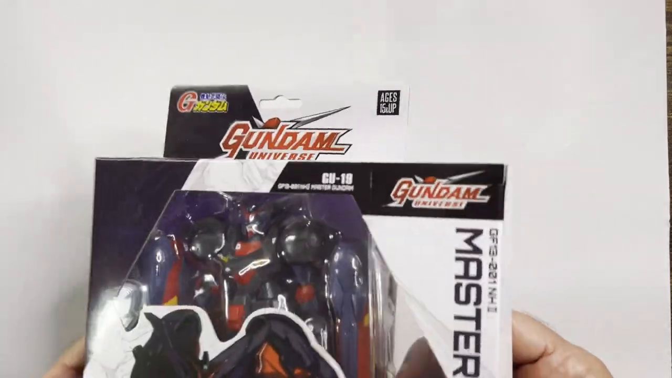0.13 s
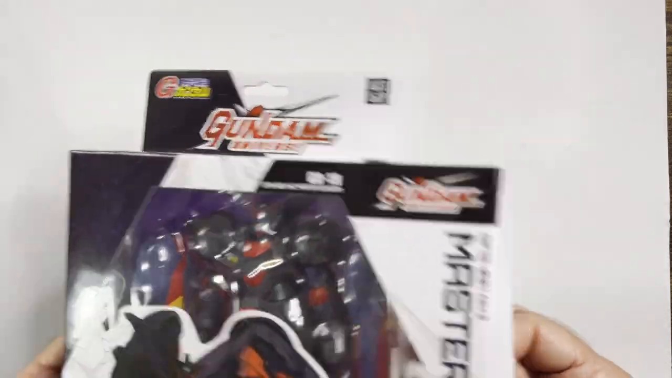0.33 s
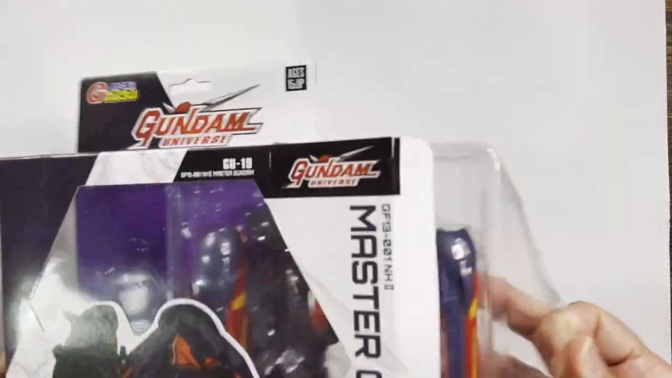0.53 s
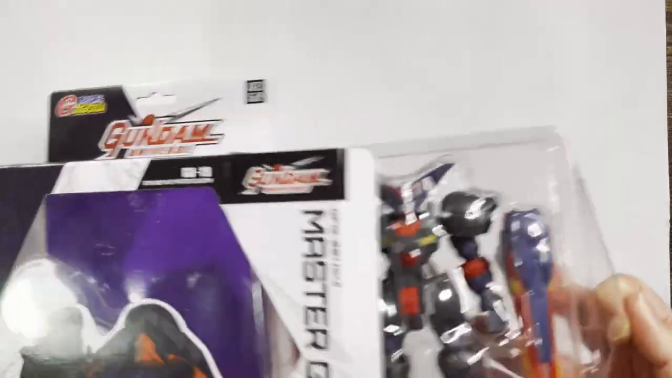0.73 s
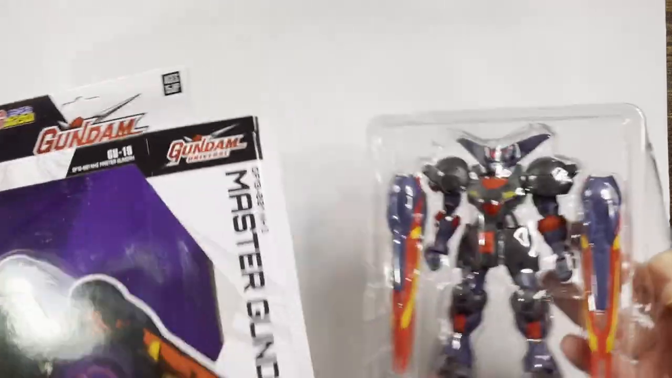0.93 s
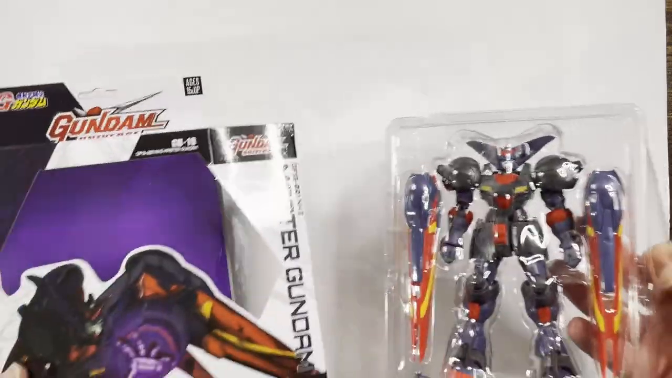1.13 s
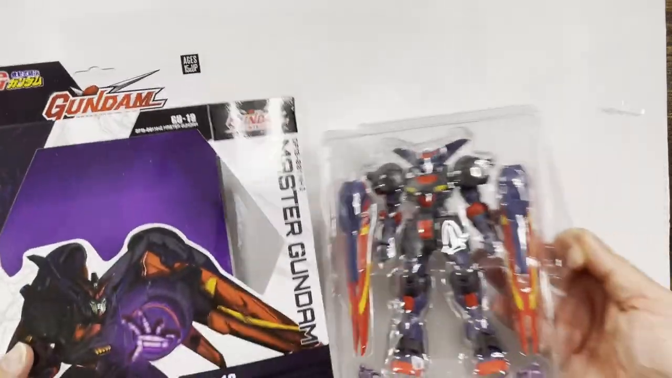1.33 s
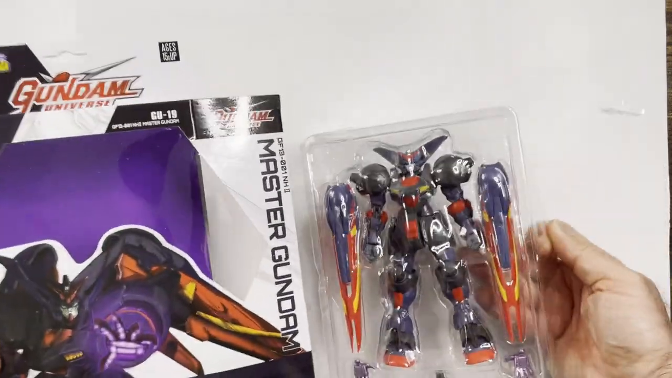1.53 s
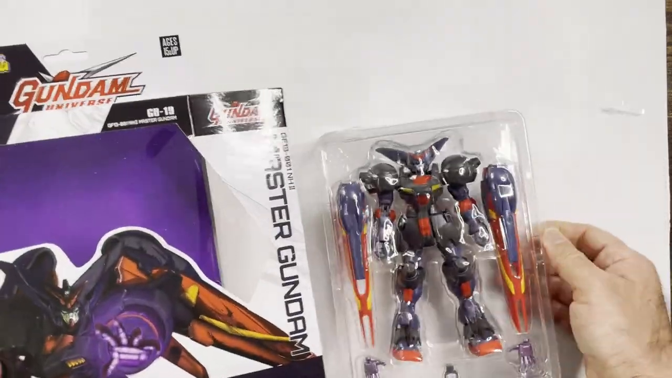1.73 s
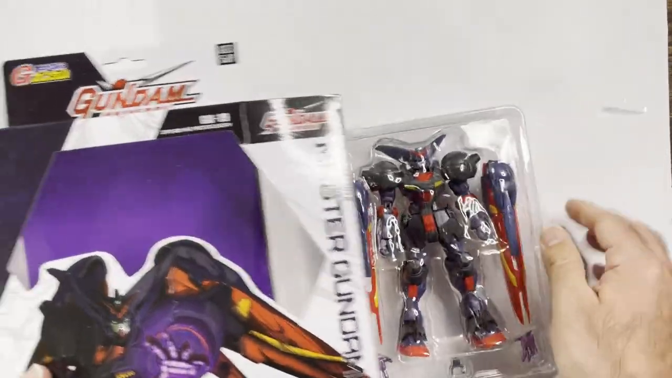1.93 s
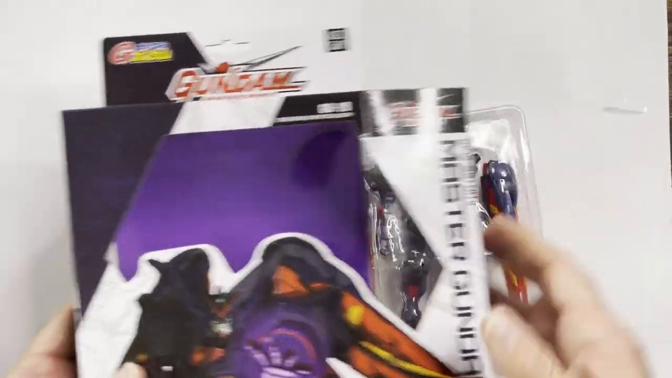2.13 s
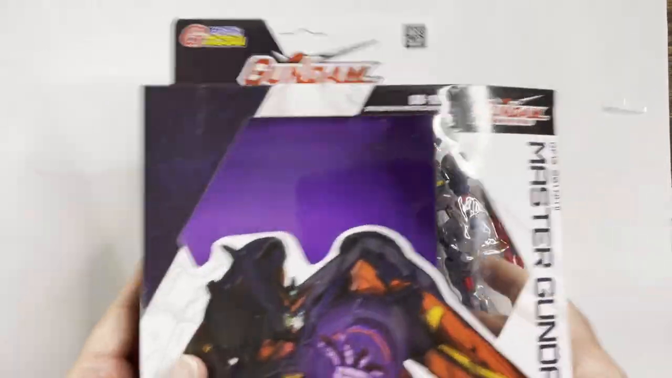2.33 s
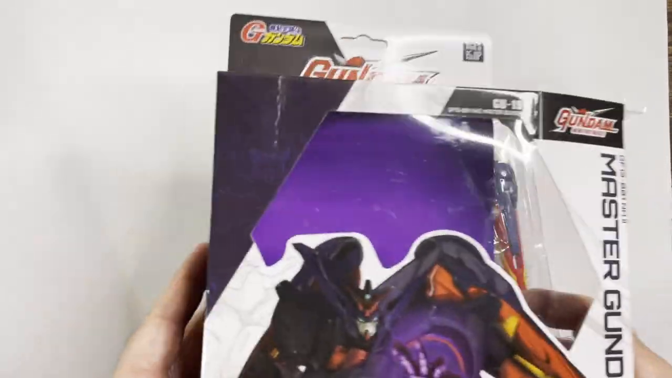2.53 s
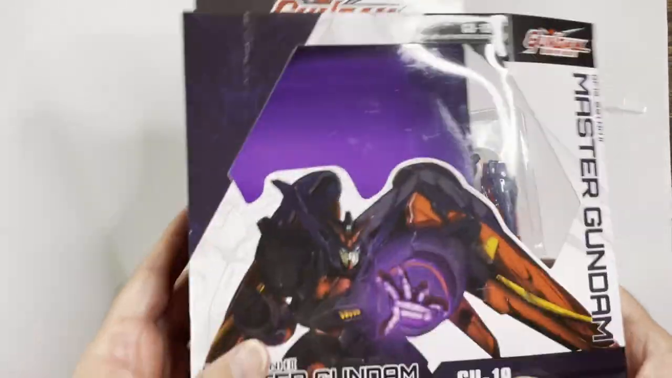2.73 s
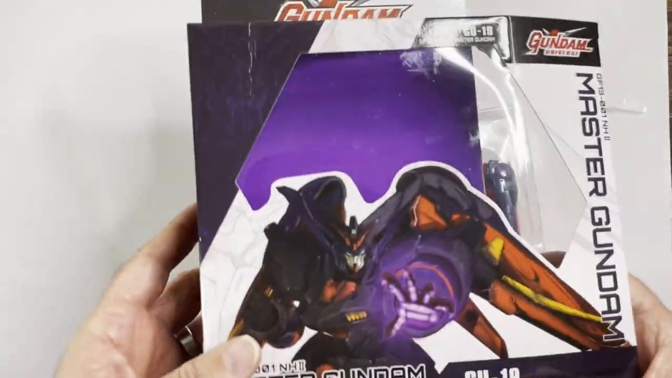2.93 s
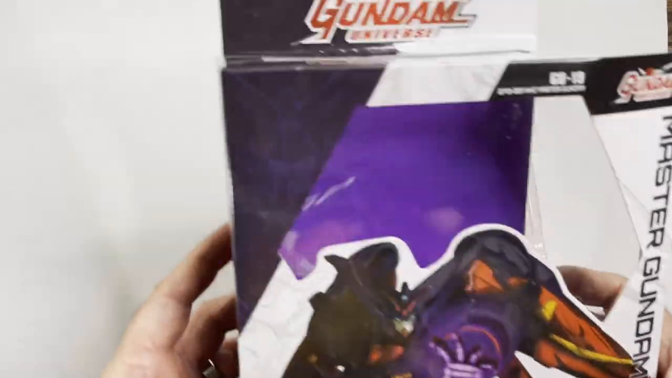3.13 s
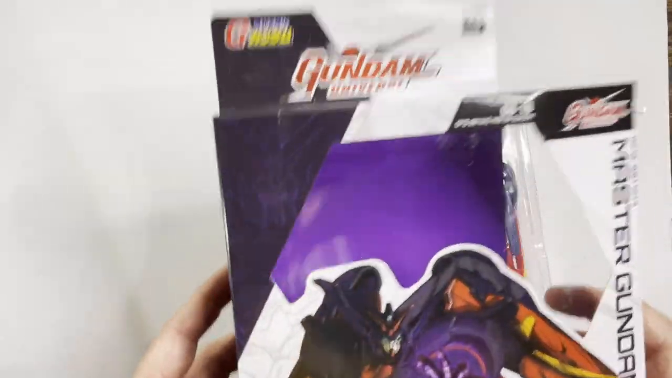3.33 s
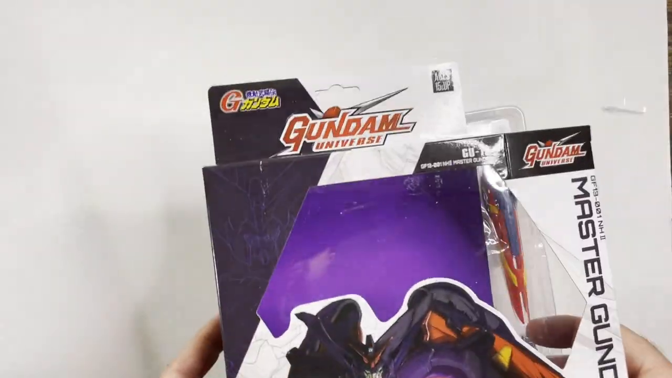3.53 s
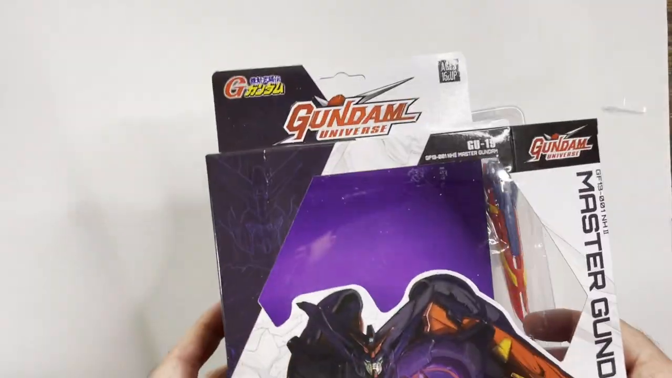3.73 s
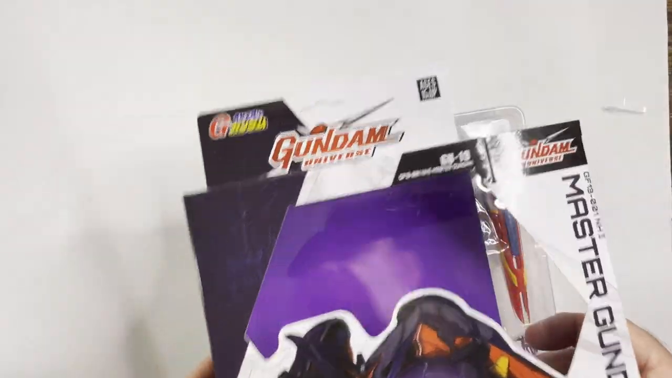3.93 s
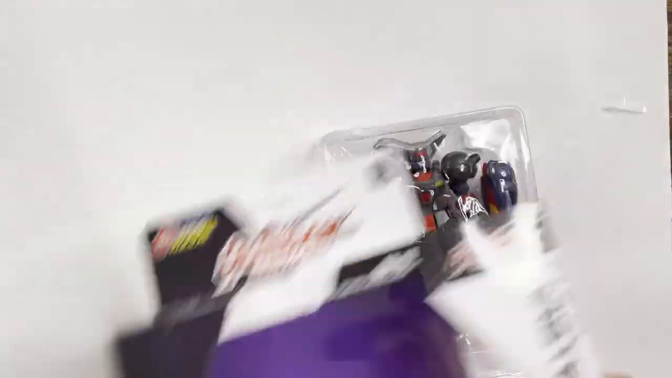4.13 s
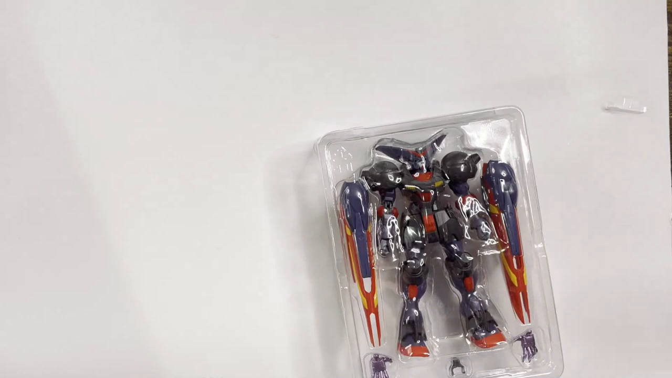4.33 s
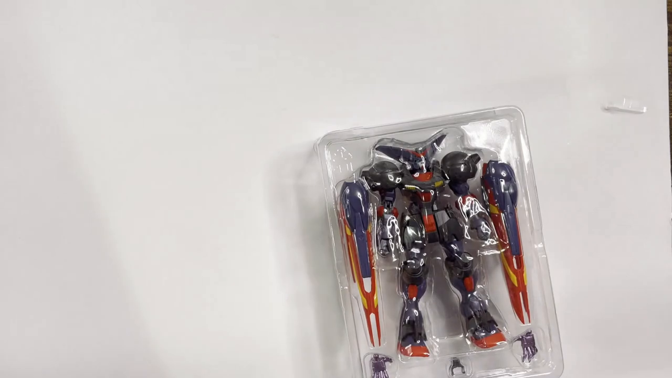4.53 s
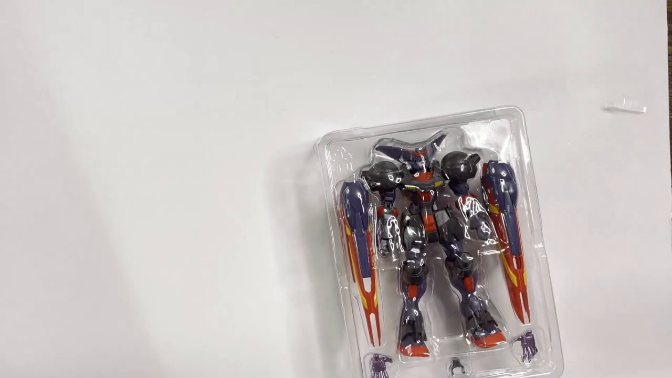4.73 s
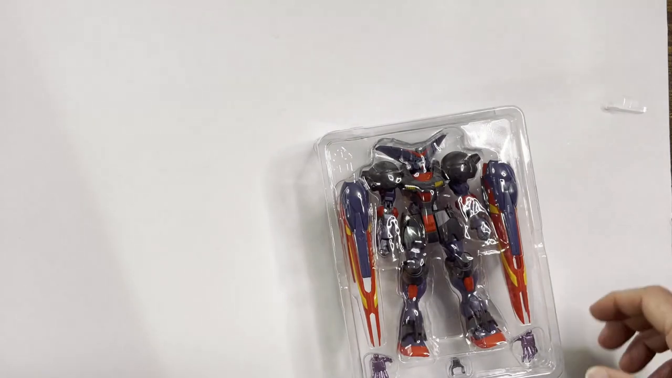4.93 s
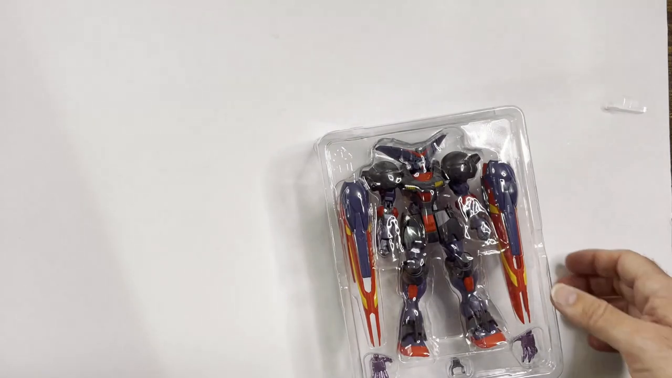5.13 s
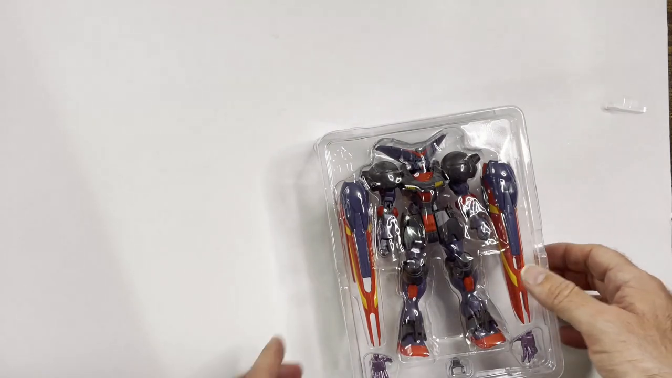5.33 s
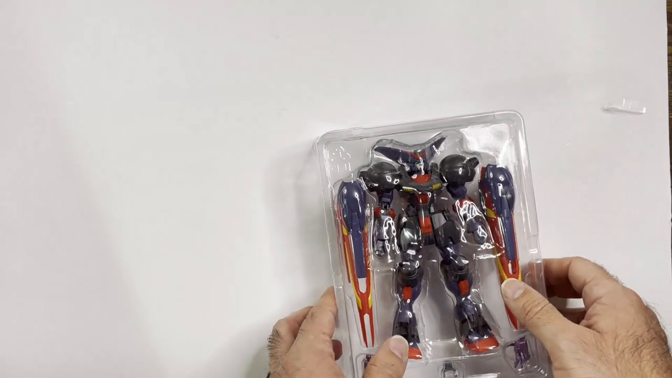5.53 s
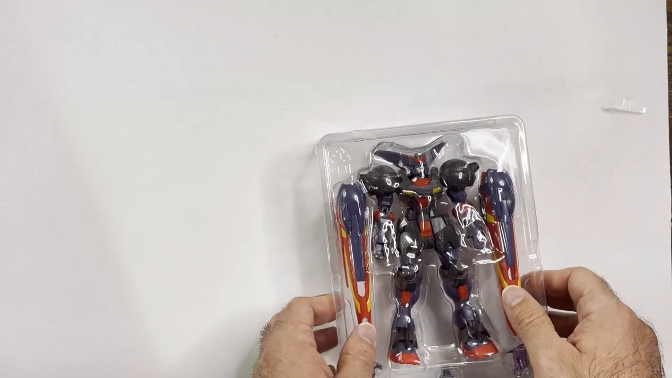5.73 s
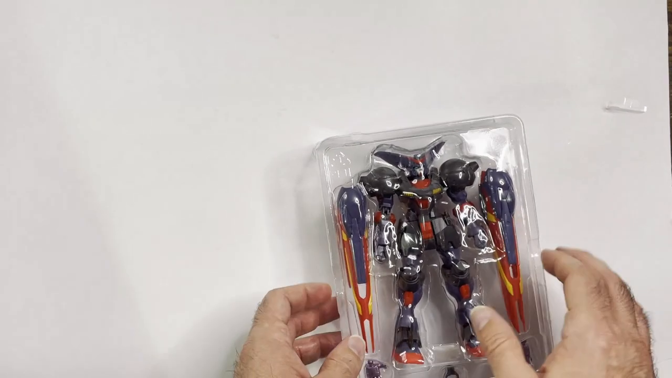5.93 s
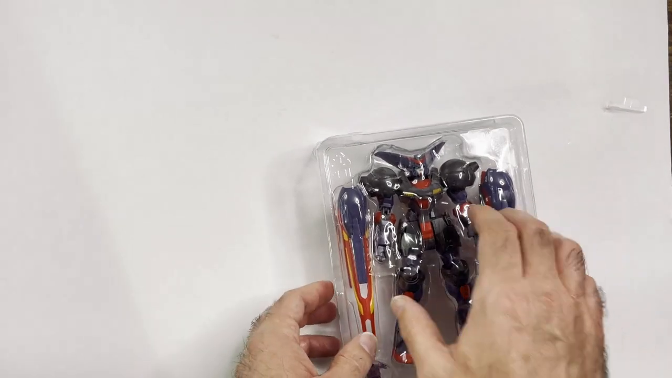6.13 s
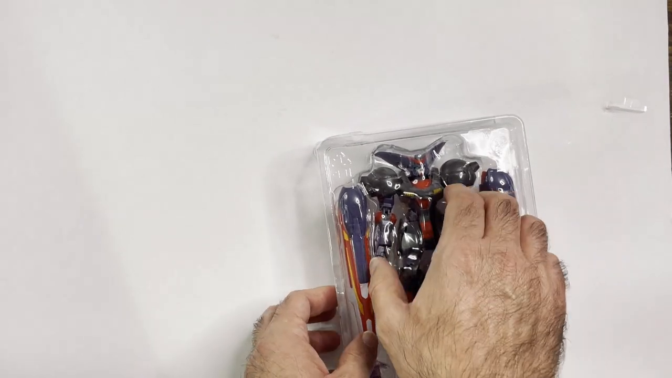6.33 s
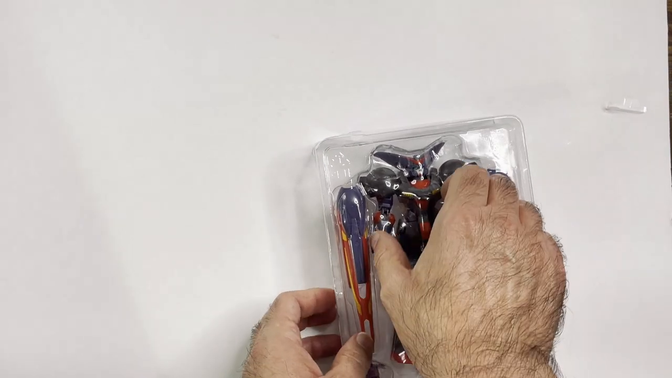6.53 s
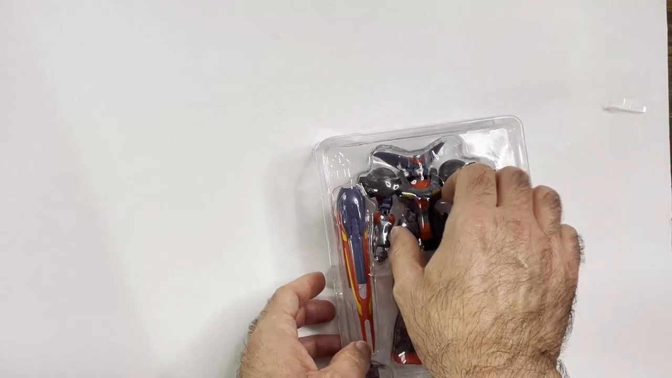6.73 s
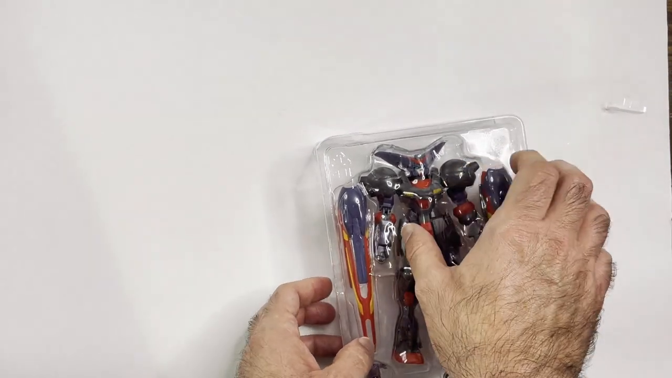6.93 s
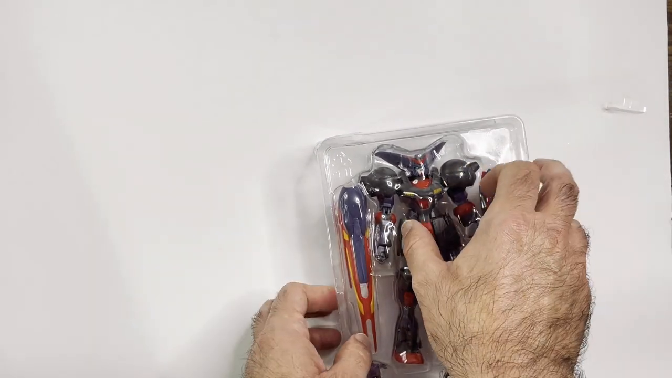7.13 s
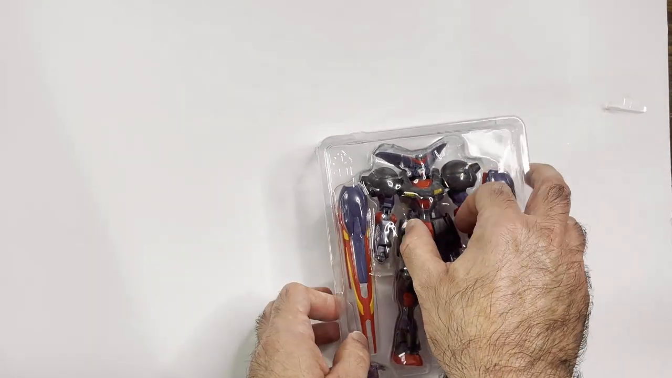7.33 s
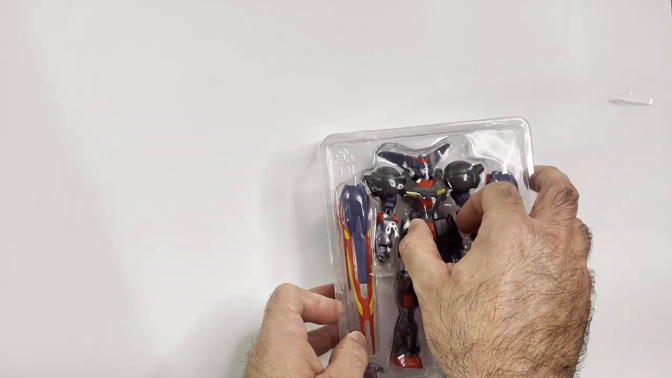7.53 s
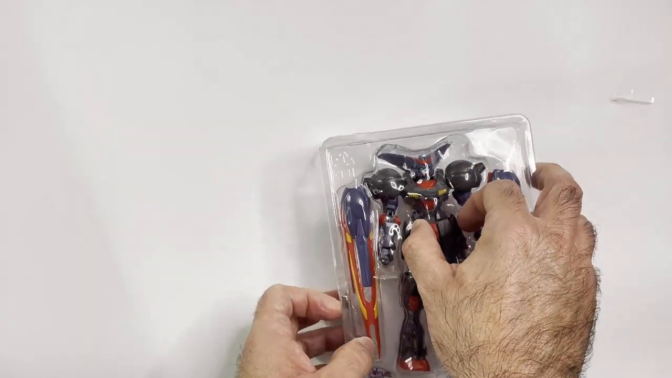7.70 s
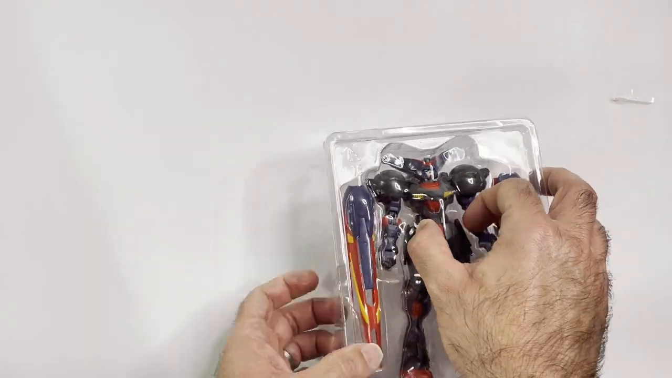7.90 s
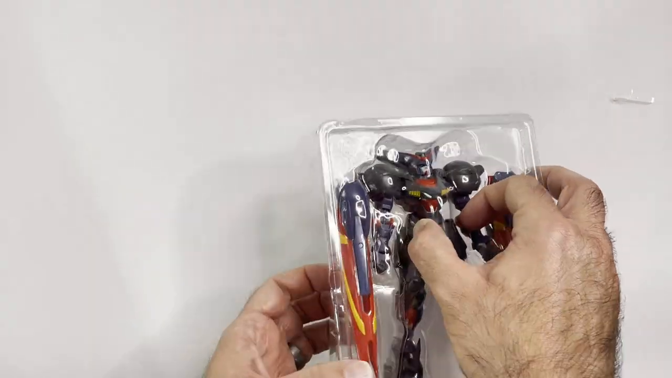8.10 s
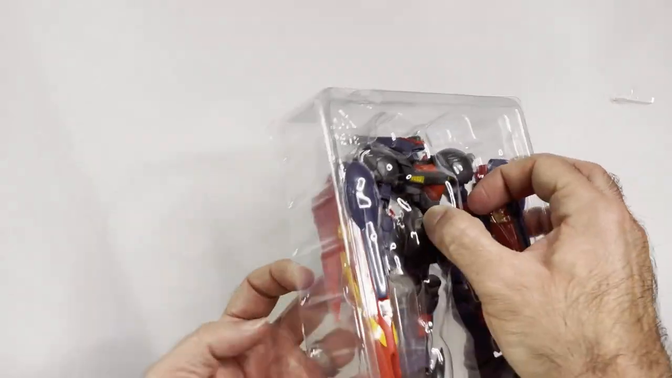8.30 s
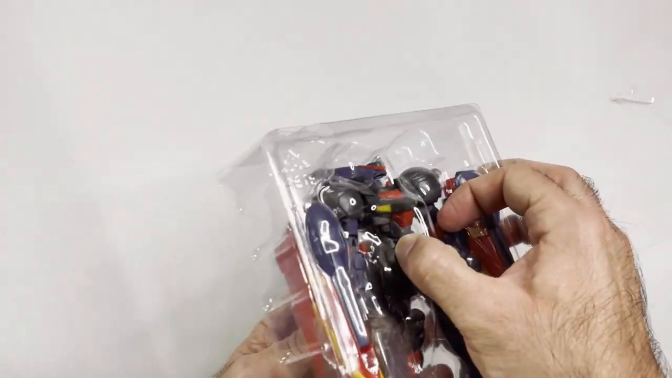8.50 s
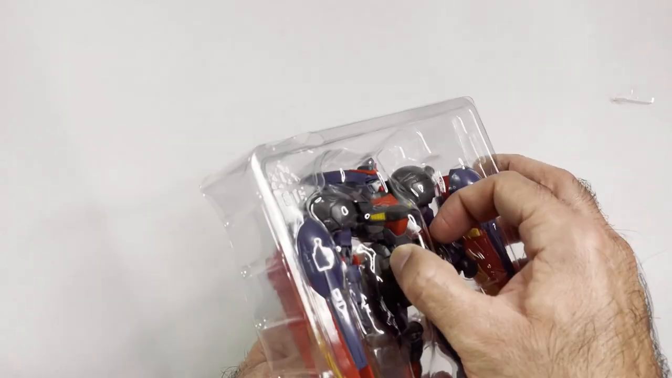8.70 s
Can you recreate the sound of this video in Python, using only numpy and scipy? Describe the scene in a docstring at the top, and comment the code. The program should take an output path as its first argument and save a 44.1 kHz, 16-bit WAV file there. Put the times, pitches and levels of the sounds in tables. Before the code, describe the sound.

Close handling of packaging: harsh plastic crunching and popping, near-quiet card taps and rubs, one sharp knock, then lighter plastic clicking and crinkling.

```python
"""In a small room, a thin plastic tray is handled, then a cardboard box, then the tray again.
Walls snap and thud as short bursts of noise that ring the object and a wavering tone for the panel.
Drags are grainy noise, skin squeaks are unsteady whistles, and moving faces push low puffs of air.
The table echoes, the room answers with a short tail, and a low rumble swells under a faint hiss.
All is heard through two microphone ports, left and right."""
import sys
import numpy as np
from scipy import signal
from scipy.fft import rfft, irfft, next_fast_len
from scipy.io import wavfile
from scipy.ndimage import uniform_filter1d

SR = 44100
rng = np.random.default_rng(int(sys.argv[2]) if len(sys.argv) > 2 else 0)


def unload_wav(signal):
    """Save mono or channel-first audio to the path in sys.argv[1] as 16-bit WAV at rate SR, clipped to [-1, 1]."""
    wavfile.write(
        sys.argv[1],
        SR,
        np.round(np.clip(np.atleast_2d(signal).T, -1, 1) * 32767).astype(np.int16),
    )


def convert_level_to_amplitude(level_db):
    """Map a level in decibels to its linear amplitude factor."""
    exponent = np.asarray(level_db, float) / 20
    return 10 ** exponent


N = 390726
M = next_fast_len(N + SR)  # padded length for filtering
HZ = np.maximum(np.fft.rfftfreq(M, 1 / SR), 1)
T = np.arange(N) / SR
SIDES = np.array([[1], [-1]])  # left, right


def along(table):
    """Reads a (frequency, value) table at every frequency, on a log pitch scale."""
    hz, value = np.transpose(table)
    return np.interp(np.log(HZ), np.log(np.maximum(hz, 1)), value)


def through(x, response):
    """Filters a sound by a frequency response."""
    return irfft(rfft(x, M) * response, M)[..., :N]


def unit(response):
    """Scales a response so that white noise keeps its power."""
    return response / np.sqrt(np.mean(abs(response) ** 2))


def band(lo_hz, hi_hz):
    """Causal band-pass, 18 dB an octave on both sides."""
    highpass = 1j * HZ / lo_hz / (1 + 1j * HZ / lo_hz)
    lowpass = 1 / (1 + 1j * HZ / hi_hz)
    return (highpass * lowpass) ** 3


def body(modes, skirt_db):
    """Resonances of alternating sign over a plain path, set relative to the strongest one."""
    peaks = 0
    for k, (hz, width, db) in enumerate(modes):
        peak = 1j * HZ * width / (hz ** 2 - HZ ** 2 + 1j * HZ * width)
        peaks = peaks + (-1) ** k * convert_level_to_amplitude(db) * peak
    return peaks + convert_level_to_amplitude(skirt_db + max(mode[2] for mode in modes))


# resonances of the tray and of the box: (frequency [Hz], width [Hz], relative level [dB])
TRAY_MODES = [(694, 1300, 1), (1180, 61, 14.5), (1480, 67, -11), (1990, 38, 13), (2420, 560, -5),
              (3360, 170, -10), (3830, 75, -22.5), (5640, 70, -17), (6200, 190, -21), (6360, 73, -15.5)]
BOX_MODES = [(700, 35, 7), (1740, 47, -25), (2240, 410, -3.5), (3120, 38, 8), (4000, 160, -8),
             (4900, 120, 1), (6170, 110, -36)]
# when the box is in the hands instead of the tray: (start [s], end [s])
BOX_TIME = (2.2, 5.03)


def ring(force, shape):
    """The object in the hands, tray or box, rings to a force within a range of pitch."""
    is_box = (T > BOX_TIME[0]) & (T < BOX_TIME[1])
    tray = through(force * ~is_box, unit(shape * body(TRAY_MODES, -11.5)))
    box = through(force * is_box, unit(shape * body(BOX_MODES, -14.0)))
    return tray + box


def held(s, hold_s, db, rise_db_s, fall_db_s):
    """Gain of strokes that rise, hold and let go at steady dB per second; their powers add."""
    s, hold_s, db = (np.asarray(v)[:, None] for v in (s, hold_s, db))
    t = T[::32]
    before = np.maximum(s - t, 0)
    after = np.maximum(t - s - abs(hold_s), 0)
    shape = db - rise_db_s * before - fall_db_s * after
    return np.interp(T, t, np.sqrt((convert_level_to_amplitude(shape) ** 2).sum(axis=0)))


def crackle(per_s, spread, smear_s):
    """Noise that comes in small slips of very unequal size, evened to rms 1 over 1/8 s."""
    size_db = spread * rng.exponential(size=N)
    slips = (rng.random(N) < per_s / SR) * convert_level_to_amplitude(size_db)
    fade = np.exp(-1 / (smear_s * SR))
    grains = signal.lfilter([1], [1, -fade], slips)
    x = rng.standard_normal(N) * (grains + 0.28)
    return x / np.sqrt(uniform_filter1d(x ** 2, size=SR // 8))


def panel(t, hz, noise):
    """One flexing panel sounds a tone whose pitch and strength waver."""
    waver = uniform_filter1d(noise, size=64) * 8
    return (1 + .5 * waver) * np.sin(2 * np.pi * hz * t + 0.83 * waver[::-1])


# walls buckle or knock (flicks() plays these too): (time [s], relative level [dB],
# panel pitch [Hz], tick level against the snap [dB], decay [dB per ms, limited to 0.2-6])
SNAPS = [(.005, 0, 1981, -30.5, 2.07), (.091, -36, 1604, -6.5, 3), (0.117, 3, 1180, -25.5, 1.7),
         (.304, -0.5, 1575, -11, 0.8), (.395, -10, 483, -18.5, 0.5), (.447, -15.5, 514, -15.5, 1.55),
         (.494, -11.5, 363, -20.5, 0), (.525, -5, 678, -28.5, 3.1), (.556, -8, 688.4, -13.5, 1.24),
         (.579, -14, 363, -15, 4.5), (.622, -17.5, 1029, -18.5, 0.75), (.658, -13, 1400, -22.5, 1.5),
         (.679, -20, 354, -24.5, 1.75), (.706, -13.5, 1523, -23.5, 1.5), (.764, -2.5, 1410, -24.5, 1.5),
         (.813, -9, 423.4, -20, 1), (.909, -2, 508.8, -23, 0.84), (.925, -22.5, 400, -8.5, 3),
         (.938, -21, 360, -8, 3), (1.058, -30, 3736, -4, 1.2), (1.089, -45, 3810, 0, 3),
         (1.123, -36.5, 4108, 2.5, 4), (1.146, -36.5, 3770, 0.5, 1.7), (1.336, -26, 2015, -21, 2),
         (1.356, -12, 721, -15.5, 1.7), (1.409, -28, 633.4, -15.5, 1), (1.497, -20.5, 1820, -13.5, 1.3),
         (1.582, -14, 1930, -20, 1.36), (1.617, -19, 1712, -15.5, 1), (1.671, -11.5, 773, -23, 1.25),
         (1.733, -19.5, 1265, -13, 0.94), (1.855, -14.5, 1037, -16, 1.07), (1.924, -10.5, 701, -21, 1.8),
         (1.955, -6, 513, -20, 1.5), (2.24, -26, 2026, -24, 2.5), (2.265, -27.5, 778, -70, 2.8),
         (2.359, -32, 700, -20.5, 0.8), (2.389, -41.5, 697, -16.5, 1.7), (2.595, -44.5, 992, -18, 1),
         (2.713, -35.5, 705, -13.5, 1), (2.757, -37, 694, -29.5, 3.1), (2.836, -43, 700, -12.5, 2),
         (2.917, -40, 670, -18.5, .5), (3.116, -42, 744, -28, 5), (3.219, -31, 718, -61, 4.5),
         (3.399, -43, 2240, -26, 1), (3.499, -62, 4000, -8, 1.5), (3.563, -53, 592, -24, 2),
         (3.942, -42.5, 760, -16.5, 3), (4.04, -35.5, 435, -19.5, 1), (4.138, -42, 543, -40, 0.5),
         (4.218, -40.5, 2110, -11.5, 1.3), (4.726, -58.5, 690, -11.5, 0.5), (4.945, -38.5, 1100, -16.5, 1),
         (4.966, -12, 663, -28.5, 1.7), (4.981, -19, 685, -17.5, .95), (5, -24.5, 680, -28.5, 0.8),
         (5.214, -44, 643, -36, 1.3), (5.375, -32.5, 746, -16.5, 2.5), (5.458, -31.5, 1092, -8.5, 1),
         (5.479, -27.5, 537.5, -22, .5), (5.499, -30, 526, -29.5, 0.2), (5.6, -34, 724, -8, 0.5),
         (5.622, -27.5, 1890, -30, 4), (5.66, -41, 770, -3, 1.15), (5.708, -31, 539, -8, 1.5),
         (5.834, -28, 789, -13, 0.4), (5.889, -8.5, 761, -35, 0.9), (5.919, -26, 715.6, -23, 1.5),
         (6.136, -29.5, 826, -15.5, 0.8), (6.152, -21.5, 792, -18.5, 1.4), (6.24, -34.5, 567, -10, 6.5),
         (6.292, -25.5, 617, -13, 1.35), (6.34, -35, 765, -18, 0.5), (6.476, -38, 800, -14, 0.5),
         (6.531, -38.5, 435, -13, 1.5), (6.573, -36, 762, -11, 3.5), (6.612, -37.5, 1400, -13.5, 2),
         (6.627, -30, 1294, -26, 2.2), (6.832, -26.5, 1180, -18, 4), (6.861, -33, 806, -11, 0.5),
         (6.934, -28.5, 768, -15, 0.37), (7.075, -28.5, 848, -17, 1.9), (7.137, -21, 700, -22.5, 3.5),
         (7.188, -31.5, 762, -8, 2.5), (7.212, -30, 1034, -8, 1.1), (7.24, -34.5, 749.4, -7.5, 1),
         (7.303, -25.5, 558.5, -19.5, 0.9), (7.362, -29, 762, -27, 1), (7.389, -33, 425, -20.5, 2),
         (7.431, -28.5, 738, -60, 1.3), (7.469, -31.5, 810, -35, 1.1), (7.521, -34.5, 856.5, -23, 0.4),
         (7.575, -37, 686, -27.5, 0.5), (7.596, -31, 640, -24, 2), (7.664, -18, 948, -35, 2),
         (7.806, -45.5, 772, -39, -0.5), (7.86, -33, 1275, -24, 1), (7.901, -38.5, 727, -37, 0.4),
         (7.952, -28, 1190, -46, 1), (7.971, -27, 559, -17, 2.2), (8.009, -29, 573, -19.5, 2),
         (8.057, -19, 1187, -13.5, 1.1), (8.076, -11, 1738, -26, 3), (8.149, -46, 366, -5, 1.1),
         (8.222, -23, 555, -28.5, 1.2), (8.267, -26, 1180, -22, 1.35), (8.289, -24.5, 438, -26.5, 2.65),
         (8.335, -29, 711, -26, 3), (8.43, -21, 717, -19, .8), (8.449, -27.5, 703, -19.5, 1.36),
         (8.479, -20.5, 1004, -26.5, 1.4), (8.509, -22, 1233, -13.5, 2.1), (8.526, -24.5, 667, -24.5, 1),
         (8.561, -14, 1513, -37, 1.86), (8.605, -28.5, 945, -21.5, 3.4), (8.676, -27, 797, -34.5, 1.5),
         (8.701, -14.5, 1023, -24, 3.6), (8.736, -31.5, 734, -23, 1.8), (8.766, -32, 1058, -40, 0.47)]


def snaps():
    """Each buckle is a short burst of force that rings the body, with a tone for the panel that gave way."""
    t = np.arange(6000) / SR
    force = np.zeros((4, N + len(t)))
    chance = rng.standard_normal((len(SNAPS), 4, len(t)))
    for (s, db, hz, tick_db, decay), (snap, thud, tick, flex) in zip(SNAPS, chance):
        i = int(s * SR)
        thud_db = -28 - 0.35 * tick_db  # the blunter the contact, the more thud
        fall_db_s = 1000 * np.clip(decay, .2, 6)
        # a slow give also starts softly; treble dies first, bass last
        rise = 1 - np.exp(-t * fall_db_s)
        slowness = np.array([[1], [1.6], [.7], [1.1]])  # snap, thud, tick, panel
        fades = convert_level_to_amplitude(-fall_db_s * t / slowness)
        # a large low panel gives a dull snap
        dull = signal.butter(3, min(2.77 * hz, 9000), fs=SR)
        snap = signal.lfilter(*dull, snap) * np.sqrt(3500 / hz)
        blow = np.array([snap, thud, tick, panel(t, hz, flex)])
        levels = convert_level_to_amplitude(db + np.array([[0], [thud_db], [tick_db], [0]]))
        force[:, i:i + len(t)] += blow * rise * fades * levels
    force = force[:, :N]
    snap = convert_level_to_amplitude(-8.5) * ring(force[0], band(300, 9000))
    thud = ring(force[1], band(110, 930))
    tick = convert_level_to_amplitude(6.5) * ring(force[2], band(3000, 7400))
    return snap + thud + tick + convert_level_to_amplitude(-2.5) * force[3]


def flicks():
    """The edge of every snap is a very short bright burst that does not ring the body."""
    blows = np.zeros(N)
    s, db, _, tick_db, _ = np.transpose(SNAPS)
    blows[(s * SR).astype(int)] = convert_level_to_amplitude(db + tick_db - 12)
    t = np.arange(2000) / SR
    pulse = np.exp(-t / .004) * (1 - np.exp(-t / 0.00092))
    env = np.convolve(blows, pulse)[:N]
    return through(env * rng.standard_normal(N), unit(band(6700, 18000) ** 2))


# a hollow face is bumped: (time [s], level [dB], decay [dB per ms, sign ignored], centre [Hz])
BUMPS = [(.447, -20, .9, 400), (.494, -25, 0, 400), (.525, -5, 1.1, 504), (0.68, -23.5, -0.5, 180),
         (2.265, -17.5, 0.72, 350), (2.757, -35.5, 0.9, 450), (3.219, -28, 0.5, 400), (4.139, -30, 1, 474),
         (4.966, -16.5, .5, 301), (4.998, -18.5, 0.9, 240), (5.22, -34, 0.4, 247), (6.153, -29, 3.5, 300),
         (7.362, -32, 0.8, 395), (8.482, -24, 1.9, 400)]


def bumps():
    """A soft push on a large face: only a broad low band answers."""
    t = np.arange(8000) / SR
    out = np.zeros(N + len(t))
    noises = rng.standard_normal((len(BUMPS), len(t)))
    for (s, db, decay, hz), noise in zip(BUMPS, noises):
        i = int(s * SR)
        low_band = signal.butter(2, [hz / 1.7, hz * 1.59], "band", fs=SR)
        low = signal.lfilter(*low_band, noise) * np.sqrt(SR / 2 / hz)
        rise = 1 - np.exp(-t / .001)
        out[i:i + len(t)] += low * rise * convert_level_to_amplitude(db - 1000 * abs(decay) * t)
    return out[:N]


# a hand grips, squeezes or drags (hands() and draught() use these too): (time [s], hold [s],
# creak of the walls [dB], boom of the hollow [dB], rasp of the edges [dB])
GRIPS = [(0, 0.0088, -18.5, -31, -31.5), (0.149, 0.022, -30.5, -40, -46), (0.291, .05, -31, -39, -37),
         (.42, 0.088, -22, -28.5, -33), (0.577, .04, -28, -32, -39.5), (0.669, 0.025, -24.5, -30.5, -33.5),
         (0.763, 0.051, -18, -28.5, -28), (.9, 0.059, -35, -47, -49.5), (1.065, 0.084, -63.5, -56, -51),
         (1.355, .1, -36, -47, -50.5), (1.498, 0.043, -58, -45.5, -53.5), (1.579, 0.097, -30.5, -39.5, -44),
         (1.722, 0.26, -42, -44.5, -50.5), (1.856, 0.11, -29, -37, -45), (1.941, 0.043, -24.5, -34, -38),
         (2.011, 0.023, -51.5, -36.5, -52), (2.254, 0.008, -62, -37, -78), (2.349, .05, -57, -51, -57.5),
         (2.526, 0.21, -66, -71, -67.5), (2.707, 0.076, -61, -49, -56.5), (2.839, 0.055, -66, -60, -66.5),
         (2.935, 0.029, -61, -61, -66.5), (3.083, 0.067, -48.5, -56, -64),
         (3.197, 0.051, -61.5, -53, -68.5), (3.396, 0.021, -63, -52, -65.5),
         (3.883, 0.041, -69, -63.5, -68), (3.942, 0.073, -53, -53, -60), (4.093, 0.1, -59.5, -60.5, -59),
         (4.723, 0.02, -69.5, -62, -68.5), (4.968, 0.043, -26.5, -25, -43.5),
         (5.08, 0.1, -56, -48.5, -59.5), (5.208, 0.082, -70, -47, -66.5),
         (5.456, 0.11, -36.5, -40.5, -49.5), (5.706, 0.024, -56, -44.5, -48),
         (5.803, 0.033, -45.5, -52, -55), (5.891, 0.08, -33, -38, -43.5), (6.141, .04, -45, -40, -56),
         (6.274, .08, -51.5, -46.5, -56.5), (6.466, 0.19, -52.5, -46, -63), (6.708, .05, -62, -59.5, -74),
         (6.834, 0.073, -43, -43.5, -52.5), (6.959, 0.021, -60, -43.5, -47.5),
         (6.196, 0.034, -50, -58, -63), (7.068, 0.22, -42, -45.5, -56), (7.367, 0.051, -51, -43, -57),
         (7.522, 0.145, -46.5, -48, -63.5), (7.713, .04, -49.5, -47.5, -63.5), (7.906, 0.14, -54, -50, -70),
         (8.054, .03, -33, -48, -51), (8.184, .05, -49, -51, -68), (8.261, 0.029, -41.5, -41.5, -72),
         (8.429, .1, -39, -40, -53), (8.555, 0.076, -42.5, -50, -58), (8.69, 0.046, -38.5, -43, -64.5),
         (8.773, .1, -49.5, -44, -57)]
GRIP_RISE_DB_S, BOOM_FALL_DB_S = 901, 168.5  # dB per second


def grip(db, fall_db_s):
    """Gain of one layer over all grips; the released walls go on settling faintly."""
    s, hold = np.transpose(GRIPS)[:2]
    main = held(s, hold, db, GRIP_RISE_DB_S, fall_db_s)
    settling = held(s, hold, db - 24.5, GRIP_RISE_DB_S, fall_db_s=70)
    return main + settling


# skin wipes over a smooth face, treble only: (time [s], hold [s], hiss level [dB])
WIPES = [(.28, .02, -45), (0.562, 0.11, -49.5), (.64, .03, -45), (0.757, .08, -43.5), (1.685, .01, -38.5),
         (1.733, .005, -33), (1.949, .03, -48), (4.117, 0.092, -59), (5.74, .03, -55.5), (5.92, 0.059, -44),
         (6.471, .008, -37), (6.871, 0.01992, -40.5), (6.965, .02, -48), (7.271, .03, -48),
         (8.488, .03, -52.5)]


def hands():
    """Dragging and squeezing: walls creak in grains, the hollow booms, edges rasp, skin hisses."""
    creak_db, boom_db, rasp_db = np.transpose(GRIPS)[2:]
    creak = grip(creak_db, fall_db_s=230)
    boom = grip(boom_db, BOOM_FALL_DB_S)
    rasp = grip(rasp_db, fall_db_s=262)
    wipes = held(*np.transpose(WIPES), rise_db_s=1499.5, fall_db_s=500)
    hiss = rasp * convert_level_to_amplitude(-11.5) + wipes
    # panels of three sizes slip at their own moments, so every grain has its own colour
    panels = [(430, 790, -7.0), (800, 1800, -7.5), (1400, 2500, -10)]  # (from Hz, to Hz, dB)
    walls = 0
    for lo, hi, db in panels:
        grains = crackle(120, spread=3.7, smear_s=0.009)
        walls = walls + convert_level_to_amplitude(db) * ring(creak * grains, band(lo, hi))
    hollow = ring(boom * crackle(66, spread=2.5, smear_s=0.024), band(120, 720))
    edges = ring(rasp * crackle(300, spread=3.2, smear_s=.005), band(3000, 7000))
    skin = through(hiss * crackle(250, spread=4.0, smear_s=.002), unit(band(6000, 17000)))
    return walls + hollow + edges + skin


SLIP_RISE_DB_S = 1104  # how fast squeaks and rubs start, dB per second
# skin slips on smooth plastic: (time [s], hold [s], pitch at that time before waver [Hz], level [dB])
SQUEAKS = [(5.469, 0.066, 5460, -42), (5.597, .015, 5550, -49), (5.663, .005, 5670, -46),
           (5.725, 0.035, 5540, -36.5), (7.218, 0.0065, 5540, -46), (7.33, 0.0073, 5500, -52),
           (7.364, 0.0071, 5700, -47.5)]


def squeaks():
    """Fast stick and slip: an unsteady, upward gliding whistle with its octave."""
    out = np.zeros(N)
    pitch_waver, level_waver = through(rng.standard_normal((2, N)), unit(band(25, 400)))
    for s, hold, hz, db in SQUEAKS:
        glide = 1480 * np.clip(T - s, -.05, .15)  # 1480 Hz per second
        pitch = (hz + glide) * (1 + 0.018 * pitch_waver)
        phase = 2 * np.pi * np.cumsum(pitch) / SR
        gain = held([s], [hold], [db], SLIP_RISE_DB_S, fall_db_s=999) * convert_level_to_amplitude(4.6 * level_waver)
        out += gain * (np.sin(phase) + convert_level_to_amplitude(-13.0) * np.sin(2 * phase))
    return out


def rub(strokes, width_hz, fall_db_s):
    """A sliding contact sings in one loose resonance: friction noise gathered around a centre."""
    out = np.zeros(N)
    for s, hold, hz, db in strokes:
        a, b = through(rng.standard_normal((2, N)), unit(band(0.99, width_hz)))
        phase = 2 * np.pi * hz * T
        gain = held([s], [hold], [db], SLIP_RISE_DB_S, fall_db_s)
        out += gain * (a * np.sin(phase) + b * np.cos(phase))
    return out


# rubs on the card: (time [s], hold [s], centre [Hz], level [dB])
CARD_RUBS = [(3.115, .015, 2180, -51.5), (3.23, .005, 2220, -50), (3.31, .07, 2240, -64.5),
             (3.404, 0.006, 2240, -48), (3.48, 0.027, 2270, -74)]


def card_rub():
    """Sliding on card makes a wide band of friction noise."""
    return rub(CARD_RUBS, width_hz=390, fall_db_s=598)


# groans of the tray: (time [s], hold [s], centre [Hz], level [dB])
TRAY_GROANS = [(5.476, .04, 535, -30.5), (5.716, 0.0064, 556, -37.5)]


def tray_groan():
    """Sliding on the tray makes a low, narrow band of friction noise."""
    return rub(TRAY_GROANS, width_hz=58.5, fall_db_s=300)


# air moved by broad faces being swung: (time [s], level [dB])
SWINGS = [(0, -10), (.06, -61), (.37, -52), (.43, -40), (.7, -39), (.95, -44), (1.05, -61), (1.5, -54),
          (1.96, -44.5), (2.2, -50.5), (2.3, -40.5), (2.58, -54.5), (2.75, -55), (2.95, -41), (3.03, -59),
          (3.25, -50.5), (3.43, -49), (3.53, -65), (4.03, -50), (4.32, -66), (5.3, -51.5), (5.7, -57),
          (8.86, -65)]


def draught():
    """Broad faces push air when swung or gripped: low noise, a little different at each port."""
    mid, side = through(rng.standard_normal((2, N)), unit(band(45, 130) ** 2))
    s, hold, _, boom_db, _ = np.transpose(GRIPS)
    swung = convert_level_to_amplitude(np.interp(T, *np.transpose(SWINGS)))
    gripped = held(s, hold, boom_db - 8.5, GRIP_RISE_DB_S, BOOM_FALL_DB_S)
    return (swung + gripped) * (mid + .25 * side * SIDES)


# echo off the table, left row then right row: (delay [s], level [dB])
TABLE_ECHOES = [(.0030, -14.5), (.0034, -23)]


def with_table(near):
    """The table returns one delayed, duller copy of the sound to each port."""
    dull = 1 / (1 + 1j * HZ / 3000)
    echo = np.array([convert_level_to_amplitude(db) * np.exp(-2j * np.pi * HZ * s) * dull for s, db in TABLE_ECHOES])
    return through(near, 1 + echo)


# time the room takes to fade by 60 dB: (frequency [Hz], time [s])
ROOM_FADE = [(150, 0.14), (600, .32), (2500, 0.084), (8000, 0.38), (15000, 0.14)]


def room(x):
    """Diffuse tail of fading noise, different at each port, with its own fade in each octave."""
    t = np.arange(SR // 2) / SR
    table_hz, table_s = np.transpose(ROOM_FADE)
    tail = 0
    for hz in 90 * 2. ** np.arange(8):
        t60 = np.interp(np.log(hz), np.log(table_hz), table_s)
        env = convert_level_to_amplitude(-60 * t / t60) * np.minimum(t / 0.018, 1)  # builds up over 18 ms
        mid, side = rng.standard_normal((2, len(t))) * env
        width = np.clip(hz / 530.0, .6, 1.) * 1.3  # low octaves are less wide
        tail = tail + rfft(mid + width * side * SIDES, M) * band(hz / 2, hz * 2)
    return through(x, unit(tail))


# colour of the background: (frequency [Hz], relative level [dB])
TONE_COLOUR = [(20, -29), (32, -12), (47, 2.5), (63, -1.5), (80, -7.5), (125, -9), (170, -20), (250, -22.5),
               (450, -29.5), (900, -42.5), (2500, -45.5), (6000, -50), (11500, -51), (15500, -60.5)]
# how alike left and right are: (frequency [Hz], likeness [0-1])
TONE_LIKENESS = [(60, 1), (300, 0.3), (700, 0.4), (3000, .5), (7000, 0.2)]


def room_tone():
    """Rumble of the building with a faint hiss: shaped noise whose level swells and sinks."""
    mid, side, slow = rng.standard_normal((3, N))
    like = np.clip(along(TONE_LIKENESS), 0, 1)
    colour = unit(convert_level_to_amplitude(along(TONE_COLOUR)))
    shared = through(mid, colour * np.sqrt(1 + like))
    apart = through(side, colour * np.sqrt(1 - like))
    swell_db = 1.3 * through(slow, unit(band(0.41, 6)))
    return (shared + SIDES * apart) * convert_level_to_amplitude(-55 + swell_db)


# where the hands are: (time [s], left louder by [dB])
HAND_SIDE = [(0, 0.5), (.84, 1), (.91, -1), (1.18, 1.5), (1.43, -1), (2.17, -0.55), (2.29, 1.5),
             (3.18, 0.5), (4.66, 1), (5.8, 0.5), (6.86, -.5), (7.8, 0), (8.86, .5)]


def panned(x):
    """As the hands move, one side gets louder and the other softer."""
    return x * convert_level_to_amplitude(np.interp(T, *np.transpose(HAND_SIDE)) / 2 * SIDES)


# phase lead of the left port: (frequency [Hz], lead [radians])
LEFT_LEAD = [(2000, 0), (4000, .3), (5250, .3), (6800, -1.2), (8200, -3.14), (11500, -6.28), (15000, -9.5)]
# loudness of the left port against the right: (frequency [Hz], left louder by [dB])
LEFT_LOUDER = [(60, 0.5), (110, 1.0), (200, 0.5), (380, 0.5), (700, 0), (1290, 1.0), (2380, 2.5),
               (4400, 3.5), (8120, 1), (15000, 2)]


def at_ports(x):
    """The two ports differ in phase and loudness, by amounts that depend on pitch."""
    lead = np.exp(.5j * along(LEFT_LEAD) * SIDES)
    return through(x, lead * convert_level_to_amplitude(along(LEFT_LOUDER) / 2 * SIDES))


def scene():
    """Sums the handling sounds, lets table and room answer, and adds moving air and background."""
    near = snaps() + flicks() + bumps() + hands() + squeaks() + card_rub() + tray_groan()
    direct = panned(with_table(near))
    return at_ports(direct + convert_level_to_amplitude(-10.5) * room(near) + draught() + room_tone())


def top_cut(x):
    """Nothing passes above the cut-off."""
    return signal.sosfilt(signal.butter(12, 15670, fs=SR, output="sos"), x)


# colour of the microphones: (frequency [Hz], level [dB])
MIC_COLOUR = [(25, -12), (45, -6), (1000, -2.5), (3000, -3.5), (6000, -5.5), (8000, -6.5), (11000, -5),
              (14000, -6), (15500, -7), (16300, -29.5)]


def record(dry):
    """The microphones colour the sound, and peaks beyond full scale are cut flat."""
    coloured = through(dry, convert_level_to_amplitude(along(MIC_COLOUR)))
    mix = np.clip(coloured, -1, 1)
    return top_cut(mix)


dry = scene()
out = record(dry)
unload_wav(out)
```